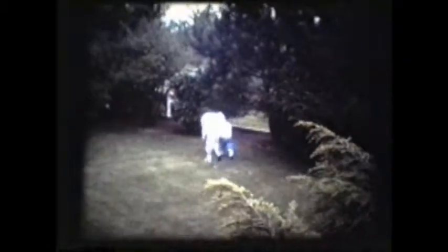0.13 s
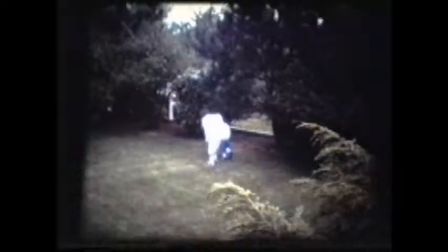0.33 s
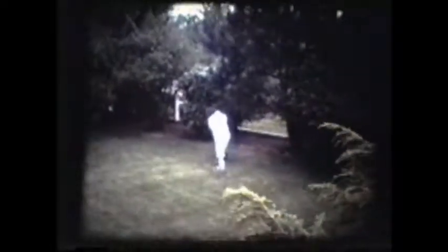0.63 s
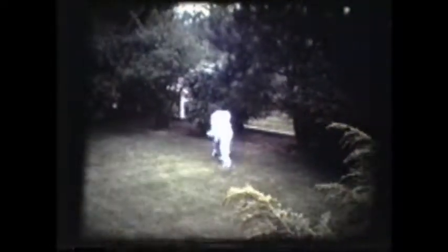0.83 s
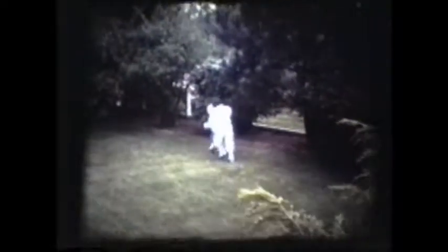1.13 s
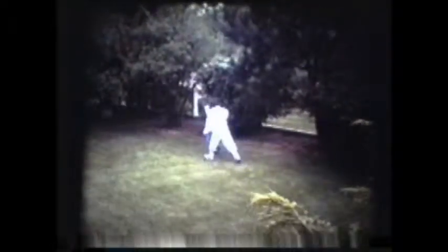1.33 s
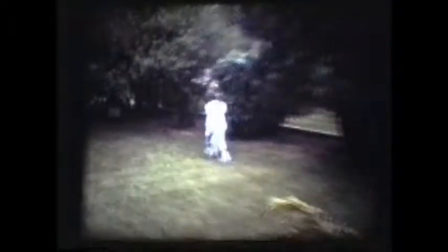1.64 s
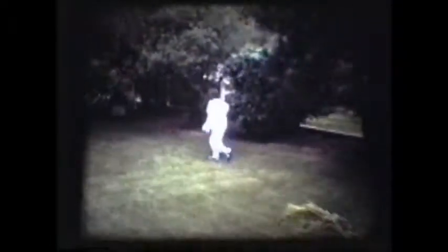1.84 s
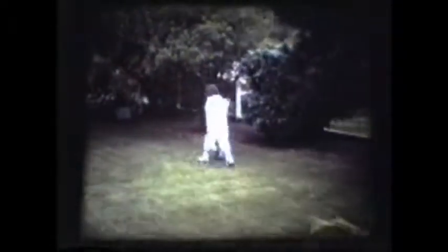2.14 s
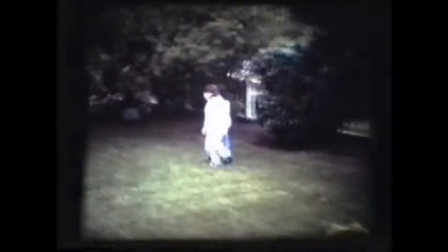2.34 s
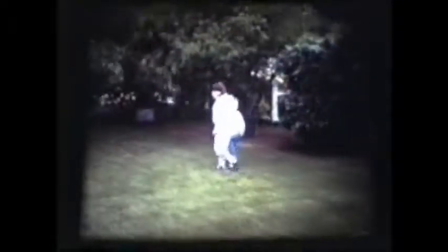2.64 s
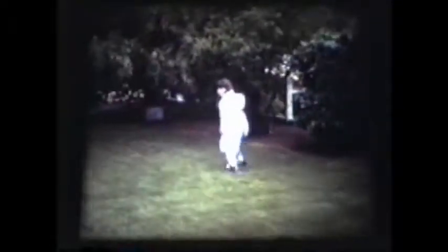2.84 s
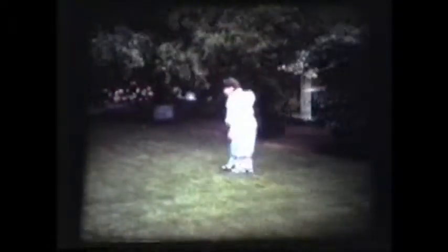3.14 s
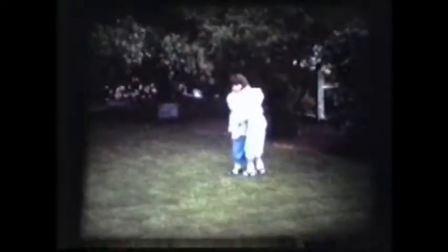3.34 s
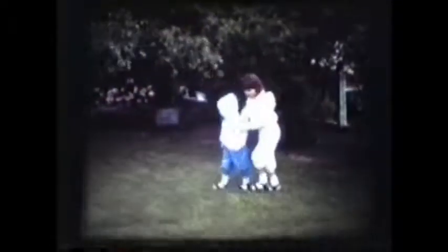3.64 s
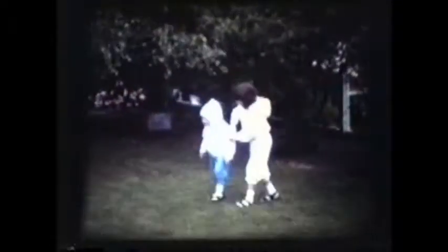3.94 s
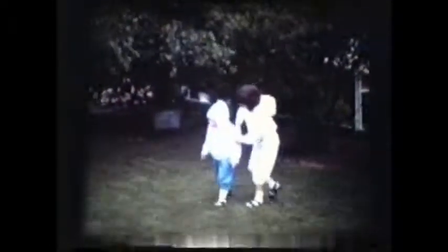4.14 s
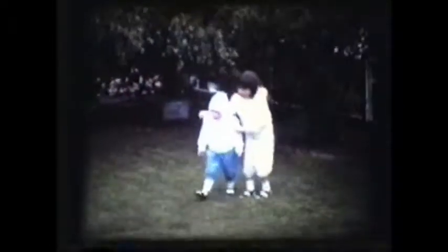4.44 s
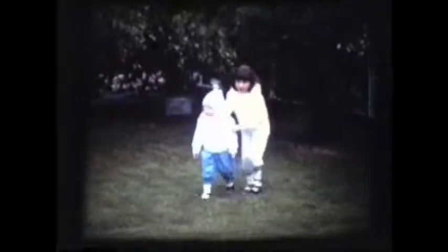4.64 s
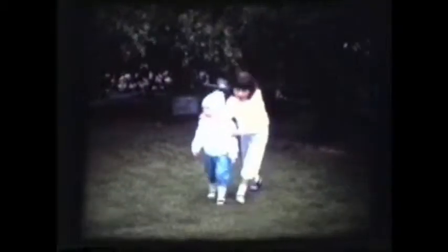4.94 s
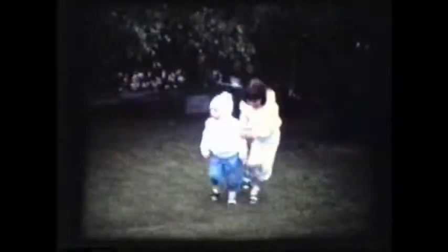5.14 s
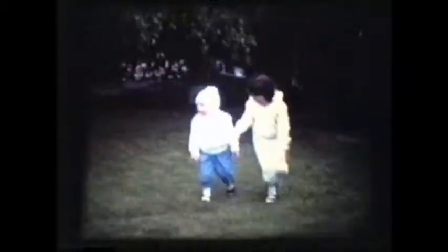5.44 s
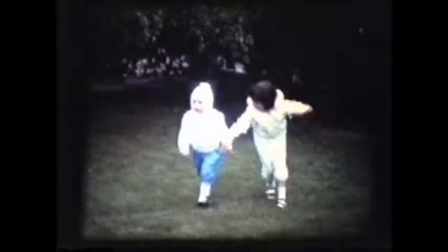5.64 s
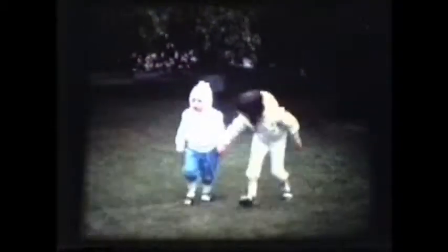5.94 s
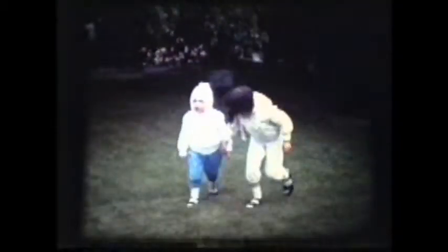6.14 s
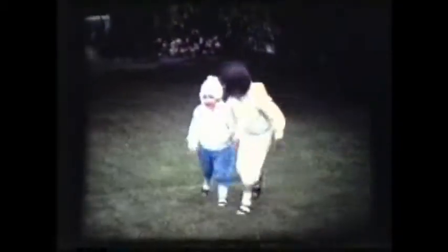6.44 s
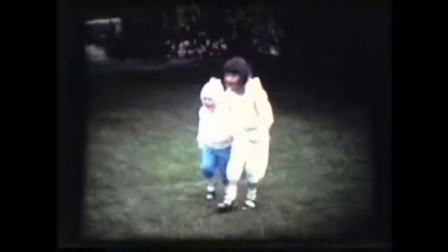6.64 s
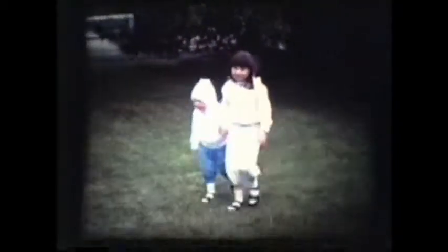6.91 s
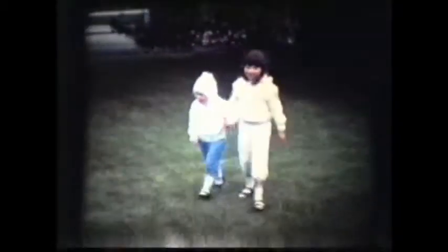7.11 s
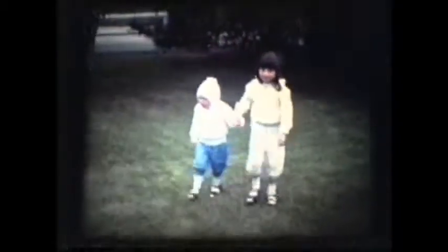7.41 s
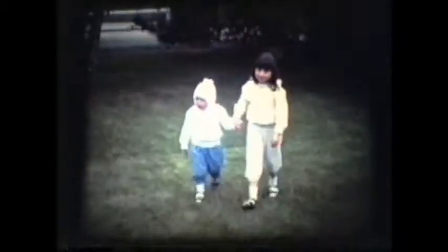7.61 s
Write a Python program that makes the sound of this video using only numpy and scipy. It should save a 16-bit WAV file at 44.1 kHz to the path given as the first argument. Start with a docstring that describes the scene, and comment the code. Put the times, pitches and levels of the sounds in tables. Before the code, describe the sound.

A small film projector is already running at 0 s, close to a mono microphone, with short bright reflections from a small room. Its noisy, midrange-heavy whirr carries a gritty rattle repeating about 17.6 times a second, uneven only slightly. Regular knocks make the case ring as a throbbing drone, above a 150 Hz motor hum and thin, wavering fan whines. Sharp, dry claw snaps come at about 0.1, 0.7, 1.3, 2.2, 2.4, 2.8, 3.3, 5.7, 6.2 and 6.8 s, the ones near 1.3 and 3.3 right by a cut. The sound cuts out at 0.26-0.48, 1.30-1.76, 3.30-3.56, 4.30-4.52 and 7.18-7.48 s. Each cut is abrupt, with a dying trace and soft low thump, leaving barely audible hiss and buzz; the projector then ramps back almost instantly. Speed and level otherwise stay constant to the end.

```python
"""Film projector with sound dropouts

A small-gauge film projector runs steadily close to a mono microphone.
Air and film make a coloured-noise whirr; frame by frame, noise bursts rattle and knocks ring the case.
The motor hums and whines in sine tones, and on some frames a film hole catches with a sharp snap.
Five times the sound cuts out to a dying trace and a soft thump, over faint electrical hiss and buzz."""
import sys
import numpy as np
from scipy import signal
from scipy.fft import rfft, irfft, next_fast_len
from scipy.io import wavfile

SR = 44100
rng = np.random.default_rng(int(sys.argv[2]) if len(sys.argv) > 2 else 0)


def wrap_up_sound(samples):
    """Save the sound to the file named by the first command line argument, as 16-bit audio."""
    columns = np.atleast_2d(samples).T
    # keep every value between -1 and 1, then stretch to whole-number steps
    tamed = np.clip(columns, -1, 1)
    steps = np.round(tamed * 32767).astype(np.int16)
    wavfile.write(sys.argv[1], SR, steps)


N = 342657
FRAME_HZ = 17.585  # film frames per second
MAINS_HZ = 50


def from_db(db):
    """Turn decibels into a gain."""
    return 10 ** (np.asarray(db) / 20)


def rms_one(x):
    """Scale to an rms (average strength) of 1."""
    return x / np.sqrt(np.mean(x ** 2) + 1e-20)


def seconds():
    """Time of every sample."""
    return np.arange(N) / SR


def bins():
    """Frequencies in Hz at which noise is coloured; the lowest is raised to 1 Hz."""
    return np.maximum(np.fft.rfftfreq(2 * next_fast_len(N // 2 + 1), 1 / SR), 1)


def curve_db(points):
    """Join spectrum points by straight lines over log frequency."""
    hz, db = np.transpose(points)
    return np.interp(np.log(bins()), np.log(hz), db)


def band_db(hz, octaves):
    """Keep a broad band around one frequency and weaken the rest."""
    distance = np.log2(bins() / hz) / octaves
    return -10 * np.log10(1 + distance ** 4)


def coloured(x, colour_db):
    """Filter by a spectrum; white noise keeps its power."""
    gains = rms_one(from_db(colour_db))
    padded_length = 2 * len(colour_db) - 2
    return irfft(rfft(x, padded_length) * gains)[:N]


def noise(colour_db):
    """Steady random noise of the given colour, with rms 1."""
    return rms_one(coloured(rng.standard_normal(N), colour_db))


def drift(rate_hz):
    """Random wavering with rms 1, mostly slower than the given rate."""
    return noise(-20 * np.log10(1 + (bins() / rate_hz) ** 2))


def clicks(times, gains):
    """Place single-sample clicks at the given times."""
    at = np.round(np.asarray(times) * SR).astype(int)
    inside = (at >= 0) & (at < N)
    return np.bincount(at[inside], gains[inside], N) + 1e-18


def ring(x, hz, t60):
    """Ring one mode, like a struck bar: it falls by 60 dB in t60 seconds."""
    radius = np.exp(-np.log(1000) / (t60 * SR))
    angle = 2 * np.pi * hz / SR
    return signal.lfilter([1, 0, -1], [1, -2 * radius * np.cos(angle), radius ** 2], x)


def fade(x, decay_s):
    """Give each click an exponential tail that starts at the click's own height."""
    return signal.lfilter([1], [1, -np.exp(-1 / (decay_s * SR))], x)


def each_frame(offset_s, spread_db, jitter_s):
    """Give one blow per film frame, a little uneven in time and strength."""
    starts = np.arange(-1, N / SR * FRAME_HZ) / FRAME_HZ
    late, strong = rng.standard_normal((len(starts), 2)).T
    return clicks(starts + offset_s + jitter_s * late, from_db(spread_db * strong))


# Colour of the fan air and sliding film noise: f/Hz, relative level/dB
WHIRR_POINTS = [(25, -9.5), (110, -13), (200, -4.5), (520, -5.5), (800, -5.5), (1250, -3), (1900, 0),
                (2550, -8), (3300, -13), (4400, -13), (6100, -19.5), (7200, -31), (12000, -39.5),
                (16000, -38)]
# Resonances (+) and hollows (-) of the housing: f/Hz, width/Hz, level change/dB
HOUSING_MODES = [(249, 22, -2), (363, 13, 4.5), (410, 77, 4.5), (470, 27, 4), (540, 26, 5.5), (609, 30, 5),
                 (658, 22, 5), (781, 20, -5), (767, 43, 14.5), (851, 25, 6.5), (910, 39, 3.5),
                 (994, 28, 6.5), (1103, 22, 6.5), (1173, 80, -1.5), (1646, 23, -4.5), (2032, 91, -4.5),
                 (2265, 39, 4), (2852, 66, 5.5), (3510, 140, -2.5), (3810, 59, 1.5), (4720, 54, 4),
                 (4940, 140, -6.5), (5230, 99, -4.5), (5840, 140, -6), (7600, 780, 3.5), (10310, 580, 6.5),
                 (12102, 700, -1), (13997, 700, 8.5)]


def whirr_colour():
    """Shape air and film noise with the peaks and dips of the housing."""
    colour = curve_db(WHIRR_POINTS)
    for hz, width, db in HOUSING_MODES:
        colour = colour + db / (1 + (2 * (bins() - hz) / width) ** 2)
    return colour


def grit(grain_db=3.0):
    """Make dense tiny impacts of unequal size, as noise with fast level changes; rms 1."""
    grain = from_db(grain_db * np.clip(drift(1100), -2, 2))
    return rms_one(rng.standard_normal(N) * grain)


# Rattling contacts in each frame cycle:
# t into cycle/s, level over whirr in its band/dB, decay/s, centre f/Hz, width/octaves, strength spread/dB
RATTLE_CONTACTS = [(.0008, 3, 0.0036, 1290, 0.67, -0.5), (.0022, 4, 0.0018, 5460, .7, 1.5),
                   (0.0145, 7, .005, 1400, 0.59, 2), (0.0147, 3, .003, 8020, 0.5, -1),
                   (0.0338, 5.5, 0.0076, 4300, 0.36, 3), (0.0435, 6.5, 0.012, 4730, 1.06, 0.5),
                   (0.0452, 6, 0.0089, 1800, 0.62, 0.45)]


def film_path(level_db=-41.5, flutter_db=.5, jitter_s=0.00074):
    """A steady whirr, with a gritty burst of rattle at every contact of claw, shutter and film."""
    colour = whirr_colour()
    rattle = np.zeros(N)
    for offset_s, db, decay_s, hz, octaves, spread_db in RATTLE_CONTACTS:
        band_colour = colour + band_db(hz, octaves)
        # how strong the whirr is within this band
        share = np.linalg.norm(from_db(band_colour)) / np.linalg.norm(from_db(colour))
        bursts = fade(each_frame(offset_s, spread_db, jitter_s), decay_s) * grit()
        rattle += from_db(db) * share * coloured(bursts, band_colour)
    level = from_db(level_db + flutter_db * drift(8))
    return level * (noise(colour) + rattle)


def room(x, wet_db=-11, decay_s=0.056, above_hz=1500, count=40):
    """Walls and furniture scatter the bright part of the sound into many quick echoes."""
    delays = rng.uniform(.004, .06, count)
    echoes = clicks(delays, rng.choice([-1, 1], count) * np.exp(-delays / decay_s))
    bright = signal.sosfilt(signal.butter(2, above_hz, "high", fs=SR, output="sos"), x)
    wet = signal.fftconvolve(bright, echoes / np.linalg.norm(echoes))[:N]
    return x + from_db(wet_db) * wet


# Modes of the case, knocked once a frame: f/Hz, rms level/dB, t60/s
CASE_MODES = [(334, -54.5, .6), (387, -52, .4), (459, -61, .25), (522, -64, .2), (612, -59, .25),
              (722, -54, .25), (739, -54, .25), (758, -54.5, .2), (876, -64, .2), (915, -65, .3),
              (1016, -65, .15), (1371, -57.5, .3), (1407, -58.5, .5), (1442, -60, .5), (1549, -63, .2),
              (1704, -60, .2), (1818, -62, .12), (1932, -61, .15)]


def case(knock_s=.0545, spread_db=.5, jitter_s=.00006, lowest_hz=260, highest_hz=2600):
    """The cam knocks the case so regularly that its modes ring on as a throbbing drone."""
    knocks = each_frame(knock_s, spread_db, jitter_s)
    # a blunt blow on a small body has little treble or bass
    blunt = signal.butter(2, [lowest_hz, highest_hz], "band", fs=SR, output="sos")
    knocks = signal.sosfilt(blunt, knocks)
    return sum(from_db(db) * rms_one(ring(knocks, hz, t60)) for hz, db, t60 in CASE_MODES)


# Motor hum: multiple of the mains frequency, rms level/dB before slight wavering
HUM_TONES = [(2, -68), (3, -44), (5, -55), (7, -59), (9, -70), (11, -68)]
# Fan and shaft tones: f/Hz, rms level/dB, both before wavering
WHINE_TONES = [(664.5, -60), (763, -59), (855.5, -58), (2005, -60), (2900, -69), (4655, -69)]


def motor(waver_db=0.1, wander=0.001185, whine_waver_db=2.5):
    """Hum at multiples of the mains, with thin fan and shaft tones that waver in pitch and level."""
    t = seconds()
    hum = np.zeros(N)
    for multiple, db in HUM_TONES:
        cycles = round(multiple) * MAINS_HZ * t + rng.random()
        hum += from_db(db) * np.sin(2 * np.pi * cycles)
    # one shared wander moves all whines in pitch; it is a fraction of their frequency
    turned = t + wander * np.cumsum(drift(5.9)) / SR
    whine = np.zeros(N)
    for hz, db in WHINE_TONES:
        tone = np.sin(2 * np.pi * (hz * turned + rng.random()))
        whine += from_db(db + whine_waver_db * drift(13)) * tone
    # a sine of rms 1 has a peak of root two
    return np.sqrt(2) * (hum * from_db(waver_db * drift(4)) + whine)


# Colour of the electrical hiss: f/Hz, relative level/dB
HISS_POINTS = [(30, 7.5), (150, 0), (600, -3), (2000, -2.5), (4500, -5.5), (9000, -12), (11000, -23.5),
               (15000, -26.5)]


def electronics(hiss_db=-83, buzz_db=-101):
    """Faint coloured hiss, and rectifier buzz at even multiples of the mains."""
    t = seconds()
    buzz = sum(np.sin(2 * np.pi * (2 * k * MAINS_HZ * t + rng.random())) for k in range(5, 13))
    return from_db(hiss_db) * noise(curve_db(HISS_POINTS)) + from_db(buzz_db) * buzz


# Frames on which the film catches harder: frame number, relative level/dB
SNAP_FRAMES = [(1, -28), (11, -25), (22, -24), (38, -26), (41, -27), (48, -27), (57, -27), (99, -22),
               (109, -26), (119, -23)]
# Modes of the claw: f/Hz, t60/s
CLAW_MODES = [(1650, .025), (1900, 0.031), (2280, 0.011)]


def snaps(catch_s=.0458, second_s=.012, second_db=-6, ring_db=-14.5,
          crack_db=-9, crack_decay_s=.003, crack_hz=1980, crack_octaves=.9):
    """On some frames a film hole catches the entering claw: a crack, then the claw rings, and a second blow
    follows 12 ms later."""
    frame, db = np.transpose(SNAP_FRAMES)
    times = frame / FRAME_HZ + catch_s
    catches = clicks(times, from_db(db))
    blows = catches + clicks(times + second_s, from_db(db + second_db))
    ringing = np.zeros(N)
    for k, (hz, t60) in enumerate(CLAW_MODES):
        ringing += (-1) ** k * ring(blows, hz, t60)  # every other mode is flipped
    bursts = fade(catches, crack_decay_s) * rng.standard_normal(N)
    crack = coloured(bursts, whirr_colour() + band_db(crack_hz, crack_octaves))
    return from_db(ring_db) * ringing + from_db(crack_db) * crack


# Times when the sound cuts out: start t/s, end t/s
CUTS = [(.2615, .479), (1.3015, 1.759), (3.3015, 3.559), (4.3015, 4.519), (7.1815, 7.479)]


def passing(shut_s=0.0005, linger_db=-15, linger_s=0.0044, leak_db=-47, leak_s=0.12, open_s=0.017):
    """Share of the sound let through: it drops quickly to a dying trace, then ramps back in."""
    t, gain = seconds(), np.ones(N)
    for start, end in CUTS:
        since = np.maximum(t - start, 0)
        linger = from_db(linger_db) * np.exp(-since / linger_s)
        leak = from_db(leak_db) * np.exp(-since / leak_s)
        closing = np.maximum(np.exp(-since / shut_s), linger + leak)
        opening = np.clip((t - end) / open_s, 0, 1)
        gain *= np.maximum(closing, opening)
    return gain


def thumps(level_db=-43.5, decay_s=.016, coupling_hz=4.0):
    """Each cut leaves a soft downward thump that settles through three coupling stages (high-passes)."""
    thump = fade(clicks([start for start, end in CUTS], np.ones(len(CUTS))), decay_s)
    for stage in range(3):
        thump = signal.lfilter(*signal.butter(1, coupling_hz, "high", fs=SR), thump)
    return -from_db(level_db) * thump


def scene():
    """Interrupt the projector but not the electronics; both channels are the same."""
    projector = room(film_path() + snaps()) + case() + motor()
    mono = projector * passing() + electronics() + thumps()
    return np.tile(mono, (2, 1))


def record(dry, cutoff_hz=15900):
    """Cut the highest treble steeply with a low-pass filter."""
    return signal.sosfilt(signal.ellip(10, .2, 80, cutoff_hz, fs=SR, output="sos"), dry)


dry = scene()
out = record(dry)
wrap_up_sound(out)
```